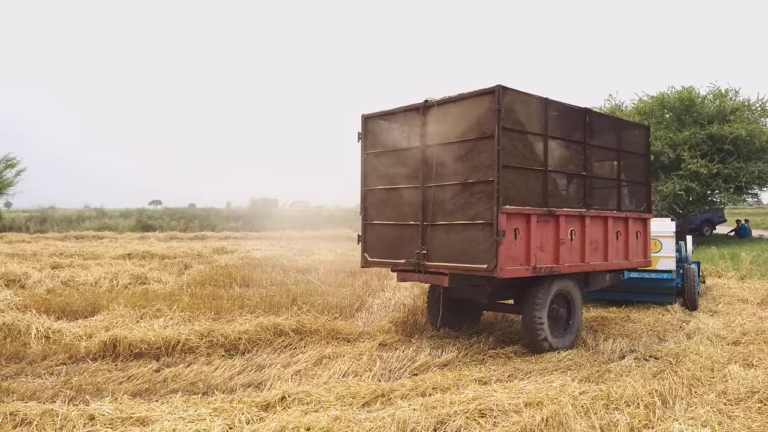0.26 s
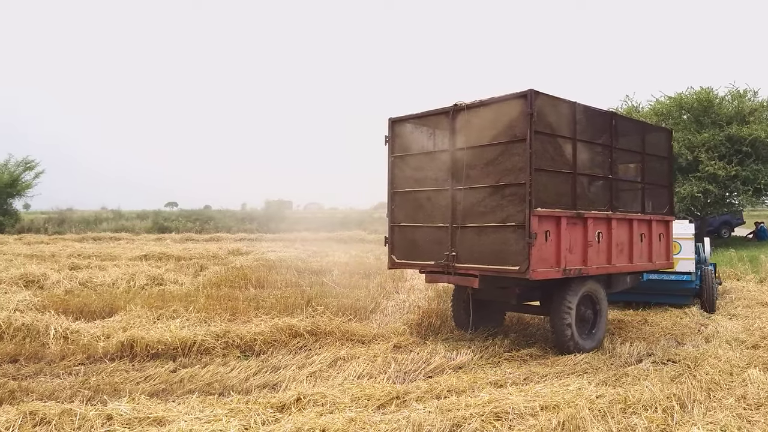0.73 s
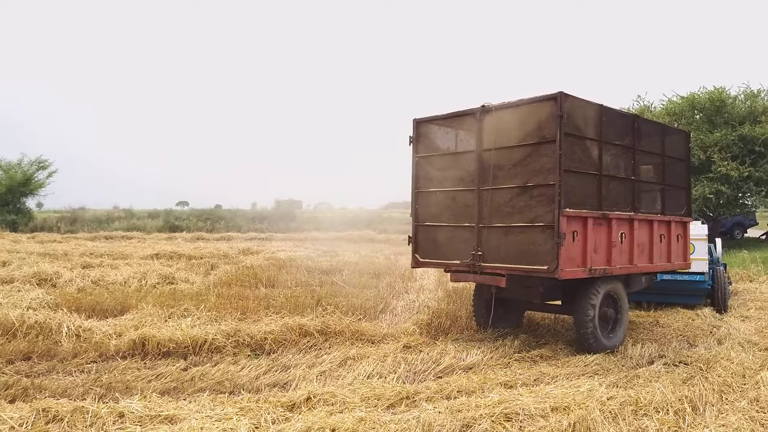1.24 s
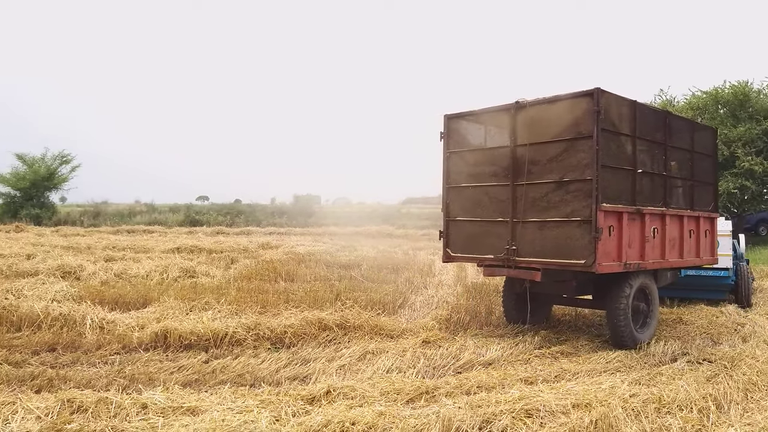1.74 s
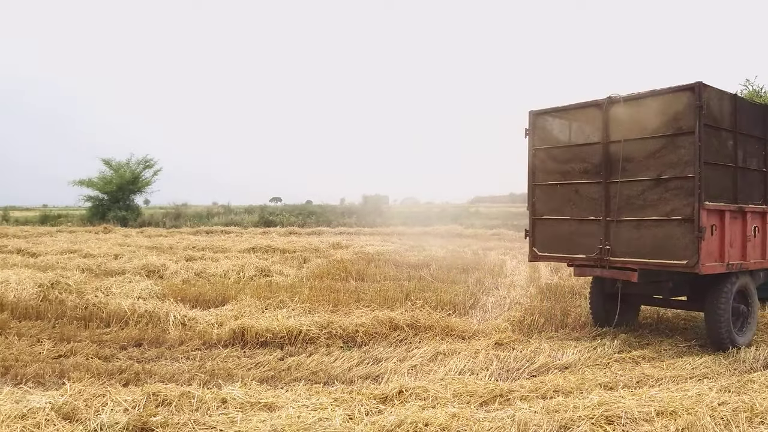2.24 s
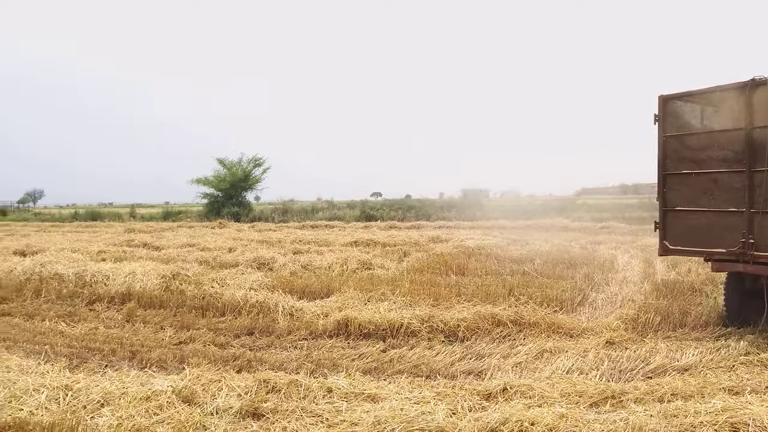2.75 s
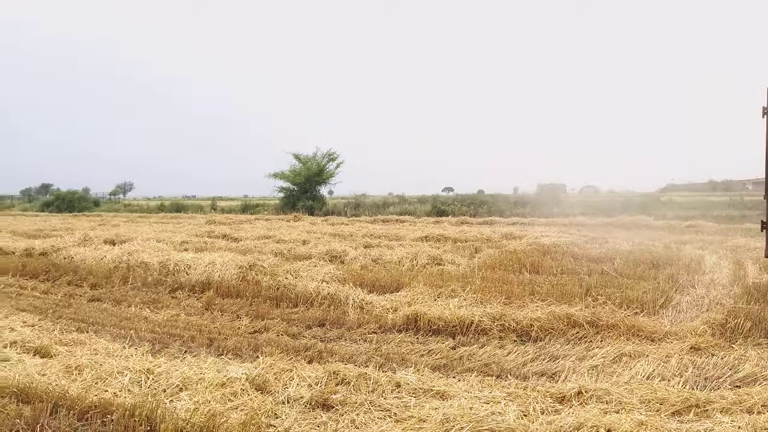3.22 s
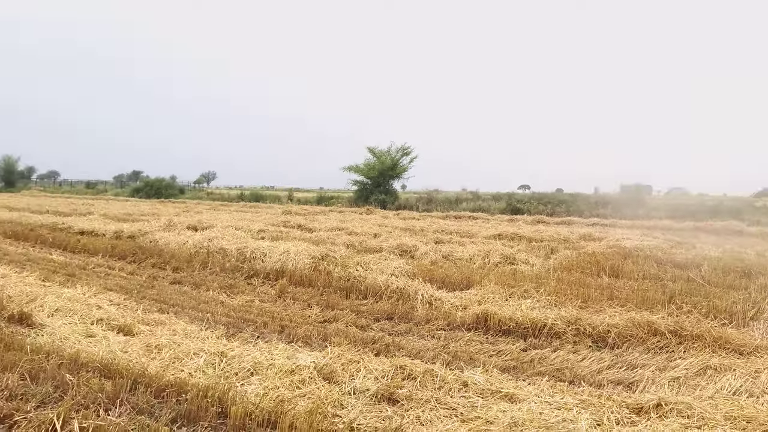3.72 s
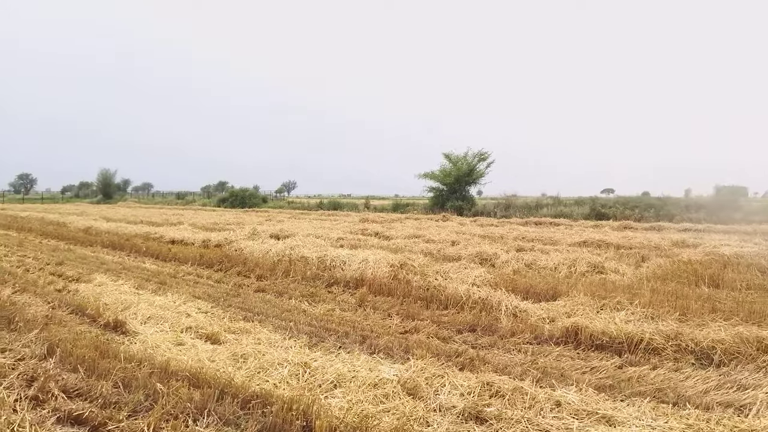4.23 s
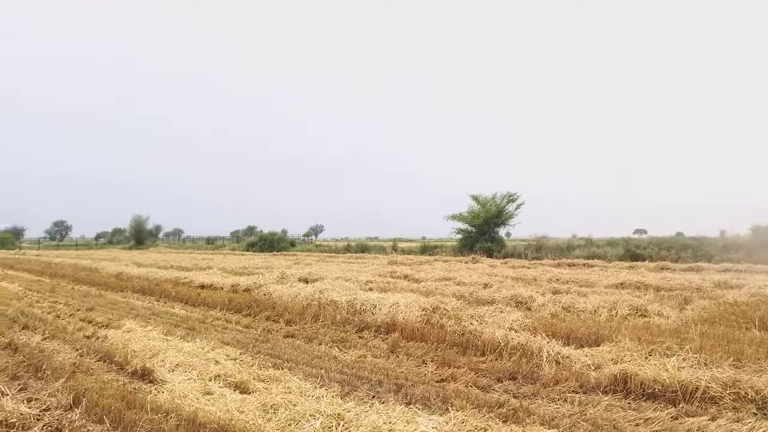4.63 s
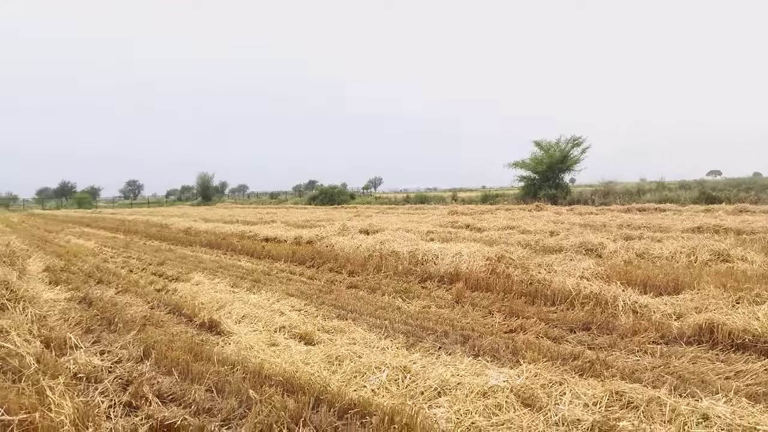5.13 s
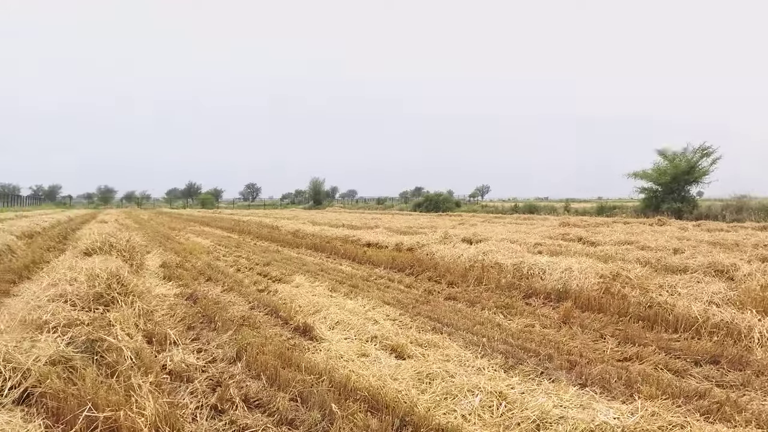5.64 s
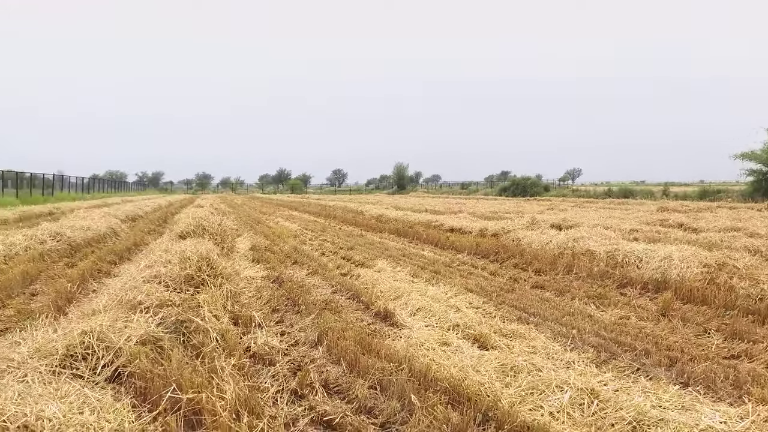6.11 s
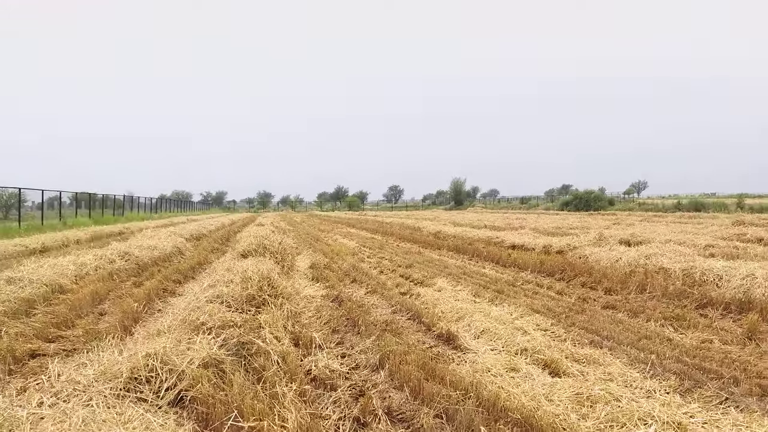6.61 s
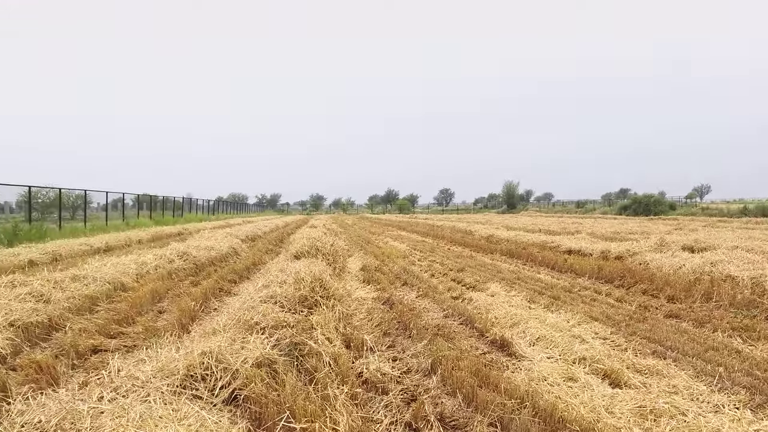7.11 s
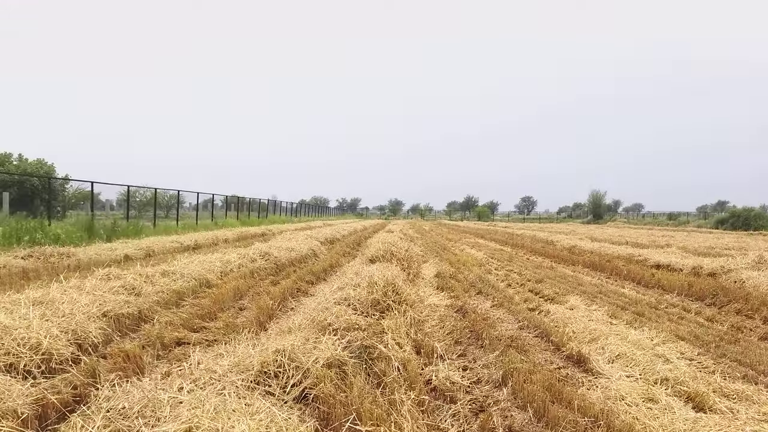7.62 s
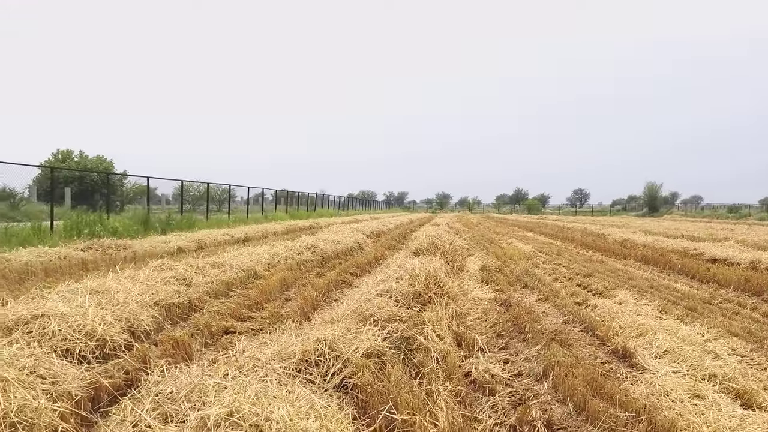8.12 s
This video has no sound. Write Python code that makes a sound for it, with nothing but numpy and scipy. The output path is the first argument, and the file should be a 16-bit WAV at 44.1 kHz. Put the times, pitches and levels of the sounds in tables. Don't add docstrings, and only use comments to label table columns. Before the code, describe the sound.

A continuous machine drone, deep and fluttering, with hissing blown straw, starts fairly near and shifts right as the handheld stereo microphone turns. Soft gusts thump mainly the right side, with a sharp pop just after three seconds. From mid-way, brushing footsteps and brittle stalk cracks appear close on the left, with brief bird whistles at right, in an open field with a faint distant echo.

```python
import sys
import numpy as np
from scipy import signal
from scipy.fft import rfft, irfft, next_fast_len
from scipy.io import wavfile
from scipy.ndimage import uniform_filter1d, map_coordinates

SR = 44100
rng = np.random.default_rng(int(sys.argv[2]) if len(sys.argv) > 2 else 0)


def volts_from_decibels(level):
    exponent = np.asarray(level, float) / 20
    return 10 ** exponent


def digitize_waveform(pressure):
    field = np.atleast_2d(pressure).T
    bounded = np.clip(field, -1, 1)
    quanta = np.round(bounded * 32767).astype(np.int16)
    wavfile.write(sys.argv[1], SR, quanta)


N = 368676

# (time [s], lag of the left port [samples])
LEFT_LAG = [(0, 2.2), (1.2, 3.6), (2, 3.9), (2.8, 7.3), (3.6, 12.9), (4.4, 13.2), (5.2, 15.4), (6, 16.3),
            (6.8, 15.8), (8.36, 17)]


def unit(x):
    return x / np.sqrt(np.mean(x ** 2) + 1e-20)


def along(points, hz):
    f, v = np.transpose(points)
    return np.interp(np.log(hz + 1), np.log(f + 1), v)


def curves(rows):
    s, *cols = np.transpose(rows)
    return [np.interp(np.arange(N) / SR, s, c) for c in cols]


def wobble(rate):
    at = np.arange(0, N + 32, 32)
    knots = rng.standard_normal(int(N * rate / SR) + 4)
    return np.interp(np.arange(N), at, map_coordinates(knots, [at * rate / SR]))


def filtered(x, response):
    m = next_fast_len(N + 8192)
    return irfft(rfft(x, m) * response(np.fft.rfftfreq(m, 1 / SR)), m)[..., :N]


def noise(spectrum):
    closed = [(1, -120)] + spectrum + [(SR / 2, -120)]
    return unit(filtered(rng.standard_normal(N), lambda hz: volts_from_decibels(along(closed, hz))))


def swells(s, db, half_s):
    power = np.zeros(N)
    for at, level_db, half in zip(s, db, half_s):
        first = max(round((at - 3 * half) * SR), 0)
        i = np.arange(first, min(round((at + 3 * half) * SR), N))
        power[i] += volts_from_decibels(2 * level_db) * np.exp(-((i / SR - at) / half) ** 2)
    return power


def at_ports(pair, left, right, alike, bounce=0):
    # (frequency [Hz], phase [rad])
    port_phase = [(1500, 0), (3000, .8), (6000, 1.2), (10000, .5), (15000, 0)]

    def colour(points, hz):
        return volts_from_decibels(along([(600, -6)] + points[:-1], hz))

    def heard_right(hz):
        share = np.clip(along(alike, hz), 0, 1)
        comb = 1 - bounce * np.exp(-2j * np.pi * hz * 0.001023 - (hz / 6000) ** 2)
        port = colour(right, hz) * comb * np.exp(1j * along(port_phase, hz))
        return port * np.array([share, np.sqrt(1 - share ** 2)])

    left_port = filtered(pair[0], lambda hz: colour(left, hz))
    return unit(np.array([left_port, filtered(pair, heard_right).sum(axis=0)]))


def patchy(depth_db):
    z = signal.stft(rng.standard_normal((2, N)), nperseg=512)[2]
    field = uniform_filter1d(rng.standard_normal(z.shape[1:]), 8, 0)
    field = uniform_filter1d(field, 12, 1)
    return signal.istft(z * volts_from_decibels(depth_db * unit(field)), nperseg=512)[1][:, :N]


def blower():
    # (time [s], rate [Hz])
    blade_rate = [(0, 72.7), (.9, 72.8), (1.4, 73.1), (2.4, 73.5), (2.7, 73.55), (3.15, 73.9), (3.7, 73.75),
                  (4.1, 73.6), (4.6, 73.3), (5.4, 73.5), (5.9, 73.4), (6.5, 73.5), (8.36, 73.6)]
    # (time [s], drone level [dB], chute whine level [dB])
    order_levels = [(0.0, -29, -32), (0.11, -27.5, -36), (0.23, -31.5, -35.5), (0.67, -26, -35.5),
                    (0.77, -32, -37.5), (1.05, -23.5, -34), (1.35, -24.5, -36), (1.53, -22.5, -35.5),
                    (2.23, -23, -39.5), (2.96, -25, -42.5), (3.35, -24, -40), (4.12, -23, -41.5),
                    (4.45, -29, -45), (4.87, -23.5, -47), (5.59, -28, -45.5), (6.33, -27, -44),
                    (7.89, -30, -45), (8.36, -25.5, -44.5)]
    # (order, level re leader [dB], leader: 0 drone, 1 third, 2 fourth order)
    low_orders = [(1, -22, 0), (5, -16, 2), (6, -10, 2)]
    # (order, level re order 11 [dB], share of the chute's swing)
    chute_orders = [(7, -18, 0), (8, -10, 1), (9, -9, .3), (10, -11, -.2), (12, -14, .5), (13, -12, 1)]
    # (time [s], level [dB])
    chute_swing = [(0, -3), (1.5, -1), (2.3, 6), (3.4, 4), (4, -1), (5.6, -5), (8.36, -7)]
    # (time [s], level [dB])
    outlet_clear = [(0, -5), (1.2, -1.5), (1.8, -7.5), (2.96, 3.5), (3.4, -1), (4.45, 1.5), (5.6, 1),
                    (6.33, -0.5), (8.2, -6)]
    # (time [s], depth [dB], half length [s])
    chokes = [
        (0.02, 2, .06),
        (1.047, 16, .03),
        (1.726, 23, 0.015),
    ]
    # (time [s], left over right [dB])
    hand_shadow = [(0, .8), (1.75, .3), (2.75, 2.4), (3.75, 2.4), (4.3, .4), (5.2, 1.5), (6.3, 4.6),
                   (7.3, 3), (8.36, 1.8)]
    # (frequency [Hz], density [dB per Hz])
    chute_spectrum = [(400, -25), (520, -11), (650, 4), (730, -6), (810, -1.5), (950, -4.5), (1020, -32),
                      (1400, -46)]
    settle_s, shaded_from_order, right_late_samples = 1.0, 10, 2

    def slow(db):
        return uniform_filter1d(db, round(settle_s * SR), mode="nearest")

    drone_db, whine_db = curves(order_levels)
    lag, t = curves(LEFT_LAG)[0], np.arange(N) / SR
    swing_db = curves(chute_swing)[0]
    turn = 2 * np.pi * np.cumsum(curves(blade_rate)[0]) / SR

    third_db = -30.5 - 0.17 * lag + 0.21 * (drone_db - slow(drone_db)) + 1.4 * wobble(2.6)
    choke_db = sum(db * np.exp(-((t - s) / half) ** 2) for s, db, half in chokes)
    fourth_db = -32.5 + curves(outlet_clear)[0] - choke_db + 0.27 * wobble(6.6)
    low_db = drone_db, third_db, fourth_db

    orders = list(zip((2, 3, 4), low_db)) + [(11, whine_db)]
    for k, db, leader in low_orders:
        orders.append((k, low_db[leader] + db + 2 * wobble(3.73)))
    for k, db, share in chute_orders:
        flutter_db = 2.5 * wobble(14) + 2 * wobble(3.91)
        orders.append((k, whine_db + db + share * swing_db + flutter_db))

    def line(k, db):
        smear = -.075 * k * k
        phase = k * turn + smear + 0.074 * k * wobble(8)
        return -np.sqrt(2) * volts_from_decibels(db) * np.cos(phase)

    shade = volts_from_decibels(curves(hand_shadow)[0] * [[.5], [-.5]])
    open_tone = sum(line(k, db) for k, db in orders if k < shaded_from_order)
    shaded_tone = sum(line(k, db) for k, db in orders if k >= shaded_from_order)

    chute_db = -41 + 0.87 * (slow(whine_db) + 39.5) + 1.0 * wobble(6.8)
    gated = unit(noise(chute_spectrum) * (1 + 0.028 * np.cos(turn)))
    chute = volts_from_decibels(chute_db + 1.46) * gated
    both = open_tone + shade * shaded_tone + casing_roar() + chute * shade ** 0.45
    return np.array([both[0], np.roll(both[1], right_late_samples)])


def casing_roar():
    # (frequency [Hz], density [dB per Hz])
    casing_spectrum = [(80, -23), (110, -11), (200, -0.5), (280, 0.5), (330, -8), (450, -10), (520, -17.5),
                       (700, -27)]
    casing_db = -25 - 0.14 * curves(LEFT_LAG)[0] + 0.42 * wobble(3.06)
    return volts_from_decibels(casing_db - 4.0) * noise(casing_spectrum)


def straw():
    # (time [s], level [dB])
    jet_level = [(0.0, -38.5), (1.46, -40.5), (1.7, -40), (1.95, -41), (2.26, -42), (2.82, -41.5),
                 (5.17, -45.5), (6.17, -51), (6.7, -58), (7.06, -52), (7.3, -60), (8.36, -57)]
    # (frequency [Hz], density [dB per Hz])
    ahead_left = [(1030, 5), (1720, 1), (2410, -4.5), (3450, -1.5), (4820, -5.5), (6030, -1.5), (7580, -9),
                  (9300, -5.5), (10340, -13), (11200, -6.5), (12060, 1), (14300, -9), (15680, -32)]
    ahead_right = [(1030, 1), (1210, -4), (1890, 0), (3450, 3.5), (5170, 1), (6550, 7.5), (7920, -1.5),
                   (9300, -1.5), (11540, 8), (12400, 0), (14470, -9), (15330, -10), (15680, -32)]
    # (frequency [Hz], density [dB per Hz])
    aside_left = [(1030, 7.5), (1250, 0.5), (1800, 1.5), (2250, -29), (2800, -2), (4500, -4.5), (5500, -15),
                  (6500, -5.5), (9000, -19), (10500, -7), (12000, -6.5), (14000, -12), (15500, -5),
                  (15700, -11)]
    aside_right = [(1030, 7), (1450, -9), (1900, 4), (2300, 5.5), (2600, -3), (3000, 5.5), (4300, -11),
                   (5000, 2), (6200, 8), (8000, 0), (11500, 3), (13000, 3), (15500, -3.5), (15700, -6)]
    # (frequency [Hz], density [dB per Hz])
    wash_left = [(1030, 2.5), (1720, 7), (2760, -7), (7060, -9), (8960, -12.5), (10850, -27), (13260, -26),
                 (15330, -20), (15680, -37)]
    wash_right = [(1030, 7), (3270, -1.5), (5340, -4), (5860, -5), (8270, -25), (9650, -20), (12060, -2),
                  (15160, -2.5), (15680, -43)]
    # (frequency [Hz], coherence [0-1])
    jet_alike = [(1000, .95), (1600, .85), (2500, .6), (5000, .42), (15000, .38)]
    wash_alike = [(1000, .95), (1600, .85), (2500, .4), (15000, .4)]

    level_db, = curves(jet_level)
    shade_db = 3 + 0.7 * np.maximum(-52 - level_db, 0)
    jet = patchy(depth_db=0.7)
    ahead = at_ports(jet, ahead_left, ahead_right, jet_alike, bounce=.4)
    aside = at_ports(jet, aside_left, aside_right, jet_alike)
    turned = np.clip((curves(LEFT_LAG)[0] - 5.5) / 2.2, 0, 1)
    hiss = (1 - turned) * ahead + turned * aside
    wash = at_ports(patchy(depth_db=1.1), wash_left, wash_right, wash_alike, bounce=0.093)
    puffs_db = .5 * wobble(4.96) + .5 * wobble(16)
    hiss_db = level_db + 7.5 + puffs_db + np.array([shade_db, 0 * shade_db])
    return volts_from_decibels(hiss_db) * hiss + volts_from_decibels(-40.5) * wash


def steps():
    # (time [s], level [dB], half length [s])
    treads = [(3.597, -39, 0.15), (3.945, -35.5, 0.075), (4.043, -35.5, 0.048), (4.09, -29.5, .012),
              (4.164, -36.5, 0.062), (4.39, -26.5, 0.031), (4.5, -40.5, 0.16), (5.214, -34.5, 0.041),
              (5.29, -31.5, 0.036), (5.387, -38, 0.035), (5.72, -38, .04), (6.01, -39.5, 0.059),
              (6.123, -33, 0.059), (6.158, -36, .018), (6.75, -44, 0.05), (7.018, -36, 0.076),
              (7.204, -36.5, 0.04), (7.332, -42.5, 0.033), (7.46, -41, 0.044), (8.227, -40, 0.1)]
    # (frequency [Hz], density [dB per Hz])
    tread_left = [(1030, -3), (1380, 6.5), (1890, -1.5), (3450, 2), (6550, -4), (7750, -8), (12230, 3),
                  (15200, -2.5), (15680, -27.5)]
    tread_right = [(1030, -7), (1380, -18), (1720, -13), (2930, 6), (6370, 0), (8960, -8.5), (12230, 7),
                   (15200, -3), (15680, -18.5)]
    shuffle_db = -48.5

    struck = rng.random((2, N)) < .04
    ticks = struck * volts_from_decibels(2.3 * rng.exponential(size=(2, N))) * rng.standard_normal((2, N))
    grains = unit(ticks) + 1.17 * rng.standard_normal((2, N))
    brush = at_ports(grains, tread_left, tread_right, [(1000, 0.19)])
    fade_in = np.clip((np.arange(N) / SR - 3.3) / 0.26, 0, 1)
    level = np.sqrt(swells(*np.transpose(treads)) + volts_from_decibels(2 * shuffle_db))
    level = level * volts_from_decibels(1.6 * wobble(35) + .4 * wobble(15)) * fade_in
    return level * brush * volts_from_decibels([[0], [-3.5]])


def stalk_snaps():
    # (time [s], peak level [dB], knock level [dB], ring time [ms], stalk pitch [Hz])
    breaks = [ (4.0897, -22, -16, .2, 4200), (5.2772, -27, -16, .3, 6500), (5.2872, -26, -5, .3, 1900),
              (5.2982, -25, -10, .2, 1800), (5.2994, -22, -5, .2, 1500), (5.3011, -22, -8, .2, 1550),
              (5.3023, -27, -12, .15, 1700), (5.4131, -16, -8, .25, 1500), (5.4179, -13.5, -10, .22, 1950),
              (5.4944, -28, -12, .2, 5200), (5.5774, -27, -1, .2, 2200), (5.671, -31, -20, .5, 2750),
              (5.6829, -19, -20, .7, 2400), (5.694, -31, -20, .5, 5700), (5.7105, -30, -14, .15, 3000),
              (5.717, -31, -20, .4, 5900), (5.7494, -24, -14, .3, 5900), (5.909, -28, -20, .5, 2700),
              (5.921, -29, -20, .4, 2600), (5.938, -28, -20, .3, 2900), (6.017, -28, -20, .6, 2000),
              (6.524, -30, -2, .4, 1300), (6.531, -30, -12, .15, 3800), (6.619, -29, -20, .9, 2250),
              (7.0194, -27, -14, .2, 4500)]
    out = np.zeros((2, N))
    t = np.arange(SR // 100) / SR
    for s, db, knock_db, ring_ms, hz in breaks:
        pan_db = 3 + .3 * knock_db
        mode_hz = np.minimum(hz * np.array([[1], [2.33], [4.6]]), 12500)
        modes = np.sum([[.9], [.8], [.35]] * np.sin(2 * np.pi * mode_hz * t), axis=0)
        u = 1000 * t / ring_ms
        crack = modes * u * np.exp(1 - u)
        knock_hz = 950 * volts_from_decibels(rng.normal(0, 1.18))
        knock = volts_from_decibels(knock_db + 6.5 - 60 * t / 0.0065) * np.sin(2 * np.pi * knock_hz * t)
        gain = volts_from_decibels(db - 1.5 + np.array([[pan_db], [-pan_db]]) / 2)
        out[:, round(s * SR):][:, :len(t)] += gain * (.55 * crack + knock)
    return out


def call_contours():
    # (time [s], length [s], start pitch [Hz], end pitch [Hz], peak level [dB])
    glides = [ (0.349, .02, 3580, 3450, -38), (1.22, .021, 3296, 3200, -34), (3.176, .016, 2850, 3600, -40),
              (3.527, .006, 4700, 3900, -37), (3.538, .006, 5500, 3900, -32),
              (3.548, .009, 4050, 3950, -33), (4.755, .016, 4900, 5250, -37),
              (4.776, .011, 3700, 3950, -40), (5.368, .01, 4100, 3100, -42), (5.884, .011, 3800, 3100, -37),
              (6.938, .008, 5500, 3300, -38), (6.973, .005, 4200, 3000, -35),
              (7.282, .007, 3000, 2000, -37), (6.244, .005, 4900, 4000, -38),
              (7.819, .008, 4400, 3800, -40), (8.138, .011, 4750, 4050, -38),
              (4.787, .011, 6700, 4200, -33), (8.05, .02, 3350, 3100, -41), (8.197, .005, 3300, 2200, -40),
              (4.811, .008, 4900, 4000, -34), (5.958, .017, 2250, 2180, -36),
              (5.476, .014, 2200, 2280, -38)]
    # (time [s], length [s], top pitch [Hz], ends over the top [ratio], peak level [dB])
    arches = [
        (4.203, .026, 2970, .84, -37),
        (5.394, .021, 3330, .86, -28),
        (7.711, .02, 3050, .85, -39),
    ]
    # (time [s], pitch [Hz], peak level [dB])
    peeps = [
        (4.376, 3100, -38),
        (5.193, 2850, -32),
        (5.213, 2900, -37),
        (5.223, 2900, -38),
        (5.317, 3750, -39),
        (5.361, 4600, -40),
        (5.551, 2900, -39),
    ]
    # (time [s], pitch [Hz], level [dB])
    twitters = [
        [(2.811, 3700, -38), (2.815, 4000, -31), (2.82, 3350, -34), (2.827, 3250, -32), (2.83, 2500, -42),
         (2.838, 2850, -40)],
        [(3.225, 3000, -38), (3.232, 3200, -34), (3.243, 2950, -33), (3.251, 2550, -39)],
        [(3.561, 3700, -38), (3.565, 3400, -35), (3.576, 3350, -33), (3.581, 2850, -29), (3.589, 2950, -31),
         (3.597, 2400, -40)],
        [(3.88, 2300, -42), (3.888, 3050, -35), (3.893, 2900, -35), (3.899, 2350, -32), (3.902, 2400, -33),
         (3.907, 3000, -39)],
        [(4.29, 2350, -42), (4.312, 2650, -39), (4.324, 3050, -32), (4.332, 2900, -37), (4.344, 2450, -38),
         (4.354, 2500, -38)],
        [(5.855, 1900, -41), (5.861, 2900, -36), (5.865, 3600, -35), (5.872, 3150, -39)],
        [(7.299, 1800, -35), (7.311, 3050, -36), (7.317, 2800, -34), (7.323, 2350, -30), (7.327, 2500, -38),
         (7.333, 3250, -35), (7.341, 3300, -37)],
        [(7.795, 2250, -42), (7.813, 2750, -37), (7.816, 2700, -46), (7.82, 3000, -33), (7.831, 3200, -38),
         (7.84, 2500, -42), (7.85, 2400, -34), (7.858, 2250, -37)],
    ]
    # (time [s], pitch [Hz], level [dB])
    warbles = [
        [(4.8, 3100, -36), (4.806, 4800, -25), (4.81, 4650, -25), (4.817, 3350, -29), (4.822, 3100, -32),
         (4.831, 3250, -36)],
        [(6.247, 2300, -34), (6.252, 3900, -27), (6.257, 3250, -25), (6.263, 3350, -28), (6.268, 2400, -35),
         (6.277, 2900, -32)],
        [(6.592, 2600, -35), (6.604, 3300, -28), (6.615, 3800, -32), (6.62, 4700, -42), (6.632, 2600, -38)],
        [(6.645, 2600, -35), (6.65, 3450, -27), (6.653, 3500, -33), (6.659, 3250, -27), (6.668, 2650, -28),
         (6.677, 2200, -37)],
        [(6.944, 3600, -31), (6.951, 4200, -42), (6.954, 5600, -34), (6.96, 4200, -29), (6.964, 3600, -33),
         (6.971, 4200, -35)],
        [(6.977, 3150, -29), (6.991, 3300, -26), (6.996, 2750, -26), (6.999, 3400, -30), (7.003, 3250, -33),
         (7.004, 2750, -28), (7.009, 2700, -28)],
        [(8.172, 2600, -36), (8.179, 4100, -33), (8.183, 4200, -50), (8.188, 4200, -34), (8.193, 4050, -30),
         (8.197, 3500, -33), (8.201, 4050, -39), (8.206, 4200, -42)],
    ]
    turn_at, peep_s = .36, .009

    calls = [(s, length, a, a + turn_at * (b - a), b, db) for s, length, a, b, db in glides]
    calls += [(s, length, ends * hz, hz, ends * hz, db) for s, length, hz, ends, db in arches]
    calls += [(s, peep_s, hz, hz, hz, db) for s, hz, db in peeps]
    simple = []
    for s, length, start, top, end, db in calls:
        simple.append([(s, start, db), (s + turn_at * length, top, db), (s + length, end, db)])
    return simple + twitters + warbles


def bird():
    song, flutter = np.zeros(N + SR), wobble(180)
    for contour in call_contours():
        at, glide_hz, glide_db = np.transpose(contour)
        s, length = at[0], at[-1] - at[0]
        u = np.arange(round(length * SR)) / (length * SR)
        db = np.interp(s + u * length, at, glide_db)
        pitch = np.interp(s + u * length, at, glide_hz)
        pitch = uniform_filter1d(pitch, size=70, mode="nearest")
        pitch = pitch * (1 + .015 * flutter[round(s * SR):][:len(u)])
        tone = np.sin(2 * np.pi * np.cumsum(pitch) / SR)
        song[round(s * SR):][:len(u)] += volts_from_decibels(db) * np.sin(np.pi * u) ** .25 * tone
    song = song[:N] * volts_from_decibels(1.2 * wobble(230))

    scatter = SR // 60
    twigs = rng.standard_normal(scatter) * volts_from_decibels(-30 * np.arange(scatter) / scatter)
    song = .95 * song + .36 * signal.fftconvolve(song, twigs / np.linalg.norm(twigs))[:N]

    t = np.arange(SR // 5) / SR
    tail = rng.standard_normal((2, len(t))) * volts_from_decibels(-60 * t / 0.3)
    tail[:, [round(.029 * SR), round(.058 * SR)]] = 5, 17
    echo = signal.fftconvolve(song[None], tail / np.linalg.norm(tail[0]), axes=1)[:, :N]
    return song * volts_from_decibels([[-14.5], [2]]) + echo * volts_from_decibels([[-21], [-8.5]])


def ground_swell():
    return volts_from_decibels(-34.5 - 0.3 * curves(LEFT_LAG)[0] + wobble(9))


def ground_rumble(swell):
    # (frequency [Hz], density [dB per Hz])
    ground_spectrum = [(20, -30), (35, -19), (48, -4), (60, -12), (75, -2), (100, -3.5), (125, -4),
                       (160, -7)]
    return 1.63 * swell * noise(ground_spectrum)


def wind(swell):
    # (time [s], level [dB], port [1 left, -1 right], half length [s])
    gust_table = [(0, -34, 0, 0.03), (0.142, -36, 1, 0.1), (1.325, -29, 1, 0.033),
                  (1.536, -21.5, -1, 0.053), (1.78, -27, -1, 0.076), (2.046, -25.5, -1, 0.19),
                  (2.375, -27.5, -1, 0.088), (2.73, -24, -1, 0.043), (3.023, -22.5, -1, 0.39),
                  (3.352, -19.5, -1, 0.035), (3.84, -35, 1, 0.084), (4.58, -39, -1, .1),
                  (5.492, -24.5, 1, 0.039), (5.683, -31, -1, 0.089), (5.99, -29, -1, 0.057),
                  (6.334, -31, -1, 0.075), (7.07, -31, -1, 0.056), (6.587, -23, -1, 0.035),
                  (6.838, -27, -1, 0.083)]
    # (frequency [Hz], density [dB per Hz])
    buffet_spectrum = [(20, -24), (35, -11), (50, -3), (90, 6), (200, 0.5), (400, -15.5), (600, -65)]
    # (time [s], peak level [dB], width [s])
    pops = [
        (3.1734, -11, .0012),
        (3.2267, -3, 0.0009),
        (3.328, -14, .0007),
    ]

    s, db, port, half_s = np.transpose(gust_table)
    left_power = swells(s, db - 30 * (port < 0), half_s)
    right_power = swells(s, db - 30 * (port > 0), half_s)
    struck = np.sqrt([left_power, right_power])
    buffet = np.array([unit(noise(buffet_spectrum) * volts_from_decibels(1.5 * wobble(16))) for _ in range(2)])
    out = (struck + 0.23 * swell) * buffet
    for s, db, width in pops:
        i = round(s * SR) + np.arange(-SR // 100, SR // 50)
        u = (i / SR - s) / width
        push, recoil = np.exp(-u ** 2), np.exp(-((u - 2.8) / 1.5) ** 2)
        out[1, i] += volts_from_decibels(db) * (push - 0.8 * recoil)
    return out


def scene():
    swell = ground_swell()
    machine = blower() * volts_from_decibels([[-.15], [.15]]) + straw() + ground_rumble(swell)
    heard_at = np.arange(N) - 1.08 * curves(LEFT_LAG)[0] - 1.4
    machine[0] = map_coordinates(machine[0], [heard_at], mode="nearest")
    return machine + steps() + stalk_snaps() + bird() + wind(swell)


def band_limit(x):
    return signal.sosfilt(signal.butter(12, 15900, fs=SR, output="sos"), x)


def record(dry):
    top_hz = 15780
    mix = filtered(dry, lambda hz: hz < top_hz)
    return band_limit(mix)


dry = scene()
out = record(dry)
digitize_waveform(out)
```